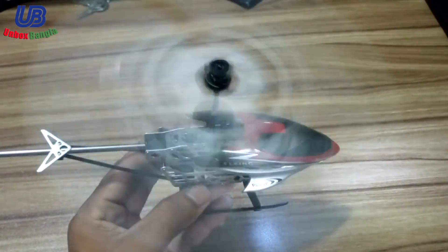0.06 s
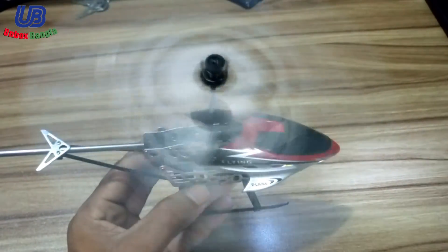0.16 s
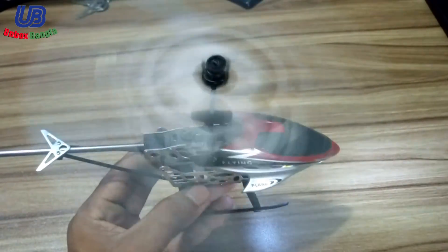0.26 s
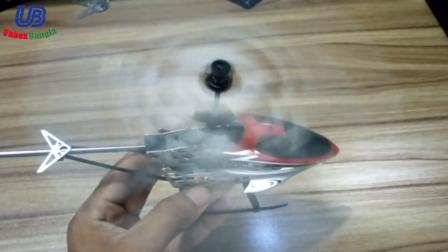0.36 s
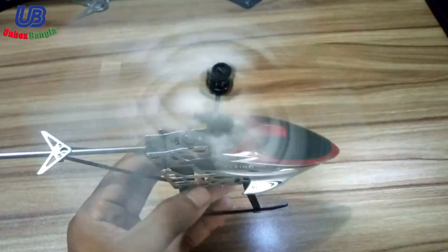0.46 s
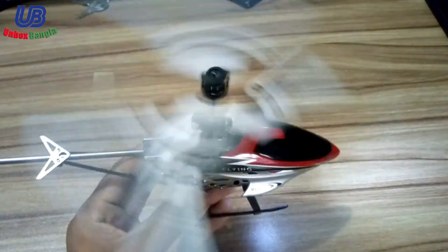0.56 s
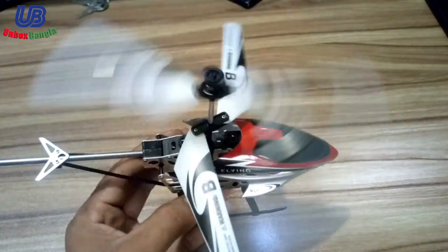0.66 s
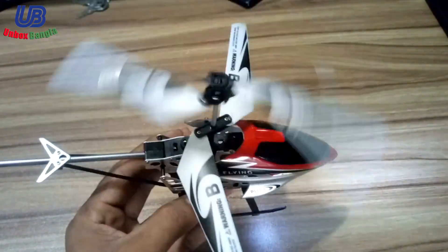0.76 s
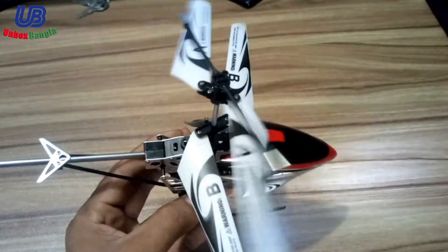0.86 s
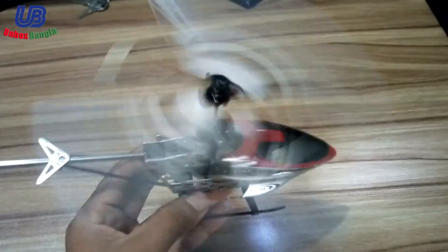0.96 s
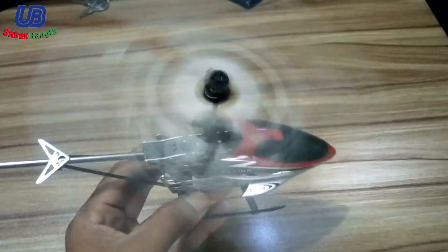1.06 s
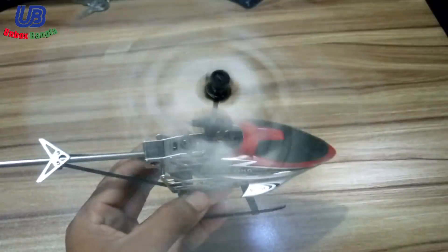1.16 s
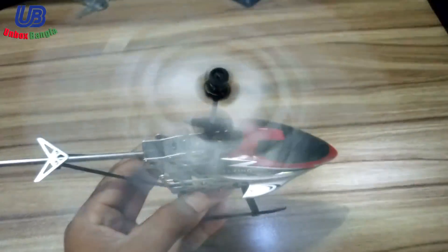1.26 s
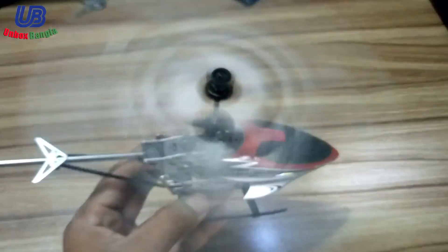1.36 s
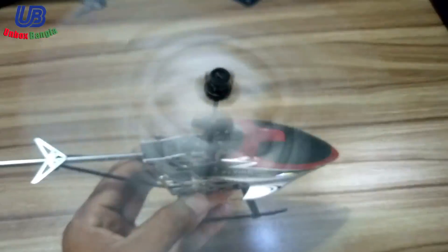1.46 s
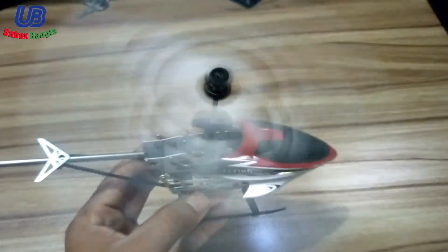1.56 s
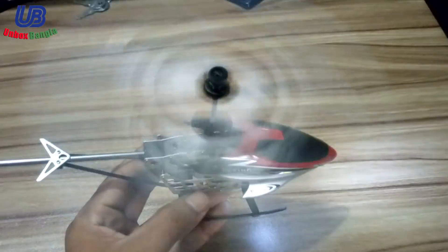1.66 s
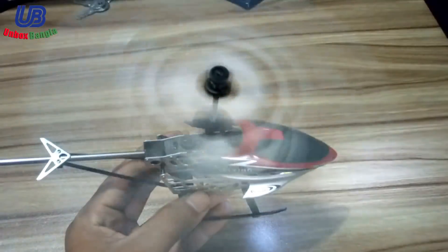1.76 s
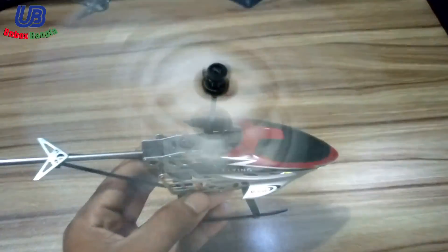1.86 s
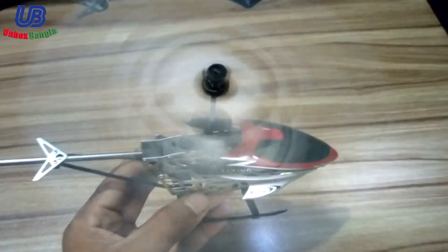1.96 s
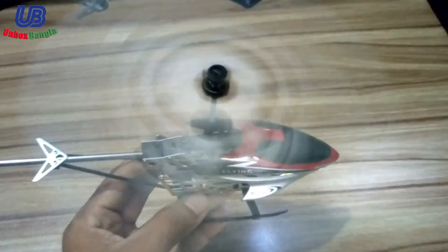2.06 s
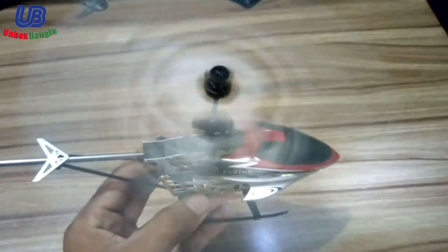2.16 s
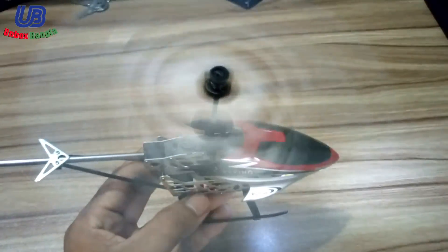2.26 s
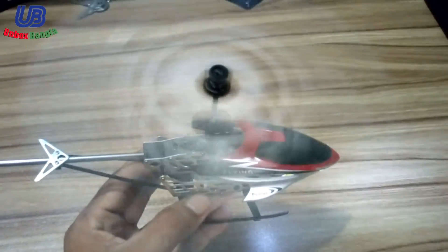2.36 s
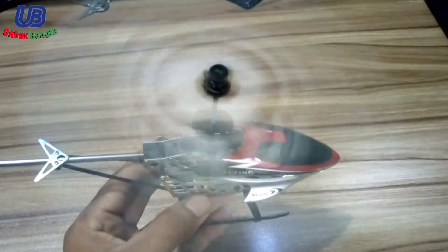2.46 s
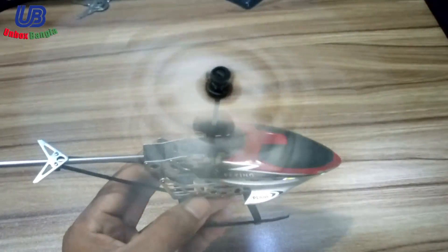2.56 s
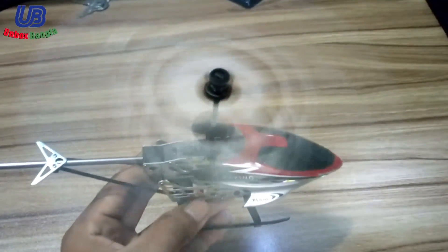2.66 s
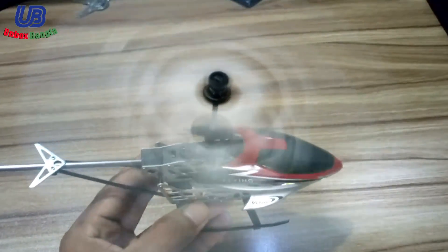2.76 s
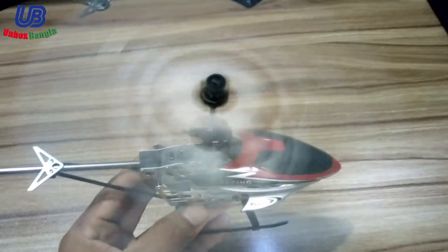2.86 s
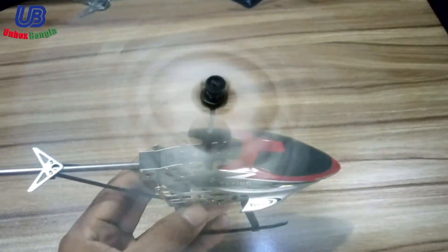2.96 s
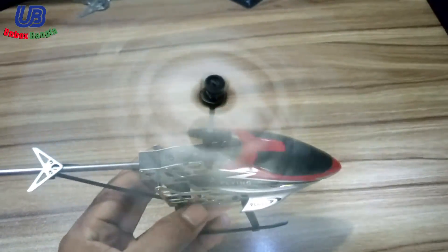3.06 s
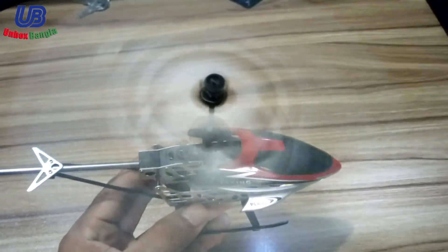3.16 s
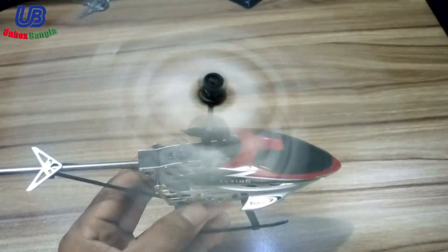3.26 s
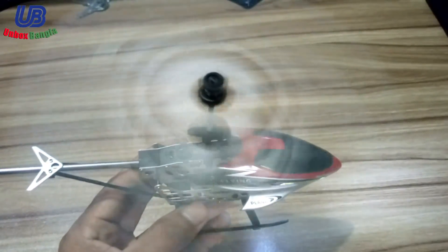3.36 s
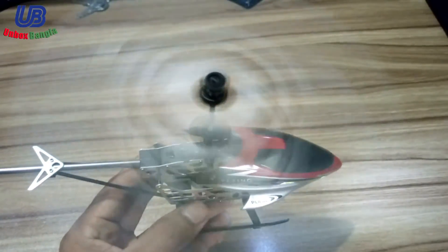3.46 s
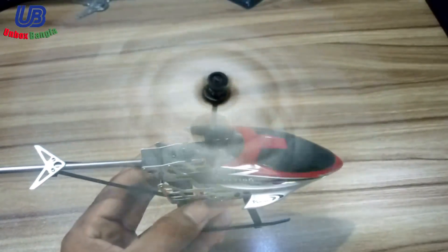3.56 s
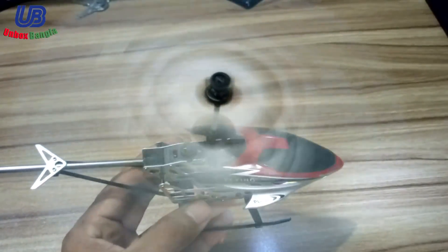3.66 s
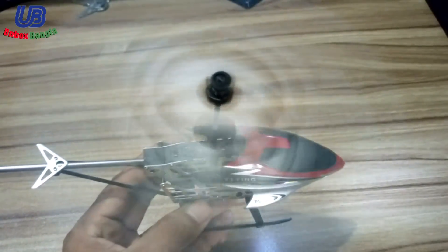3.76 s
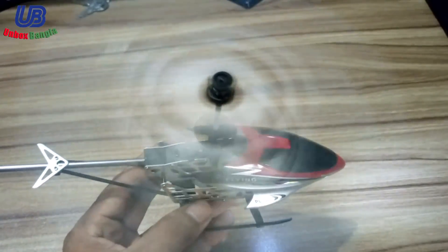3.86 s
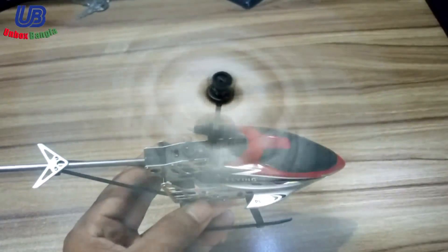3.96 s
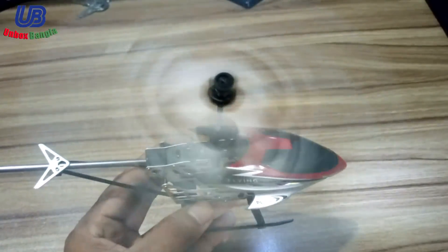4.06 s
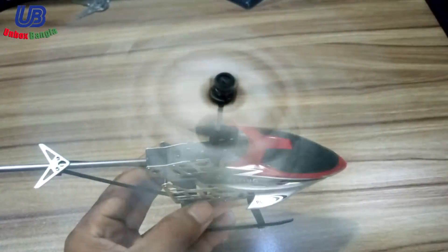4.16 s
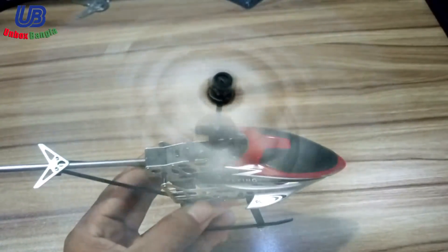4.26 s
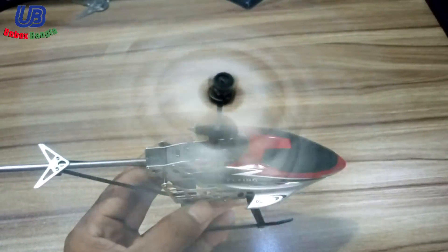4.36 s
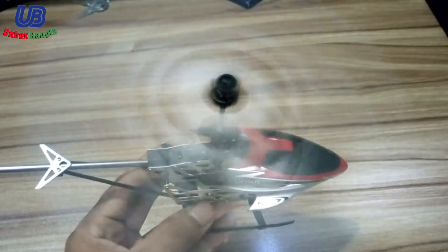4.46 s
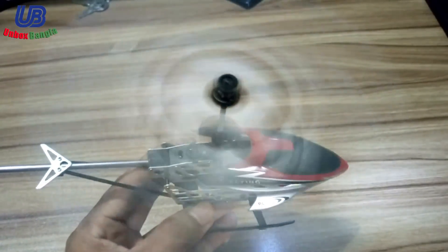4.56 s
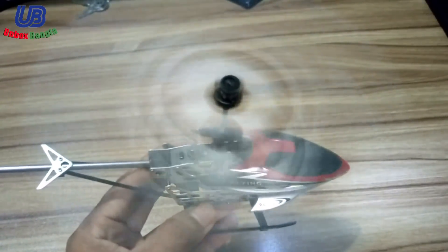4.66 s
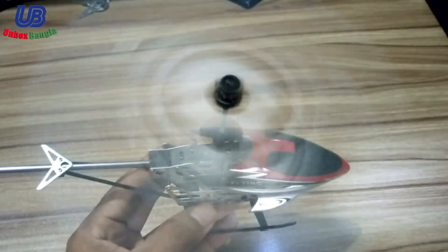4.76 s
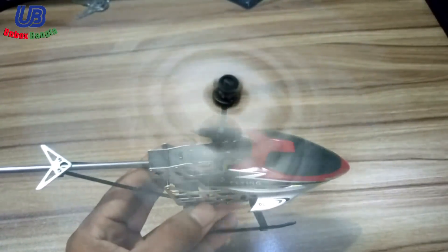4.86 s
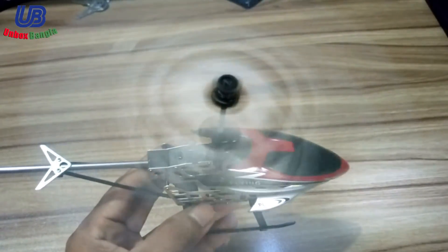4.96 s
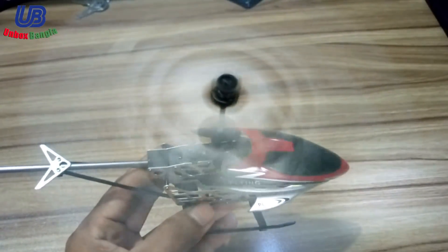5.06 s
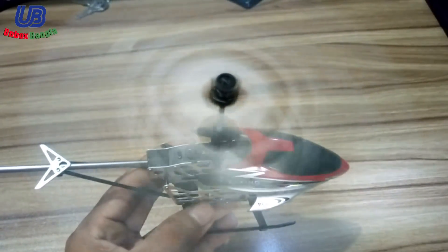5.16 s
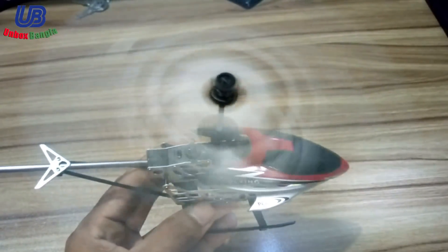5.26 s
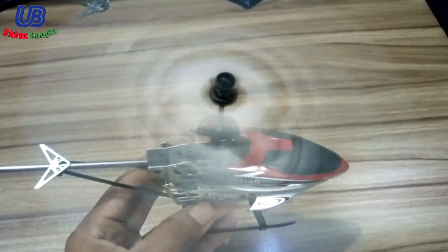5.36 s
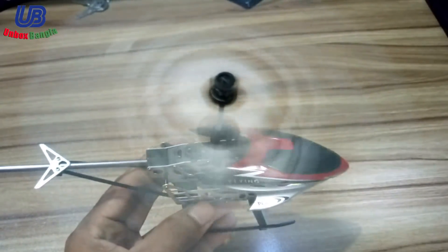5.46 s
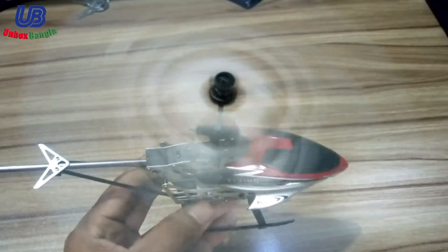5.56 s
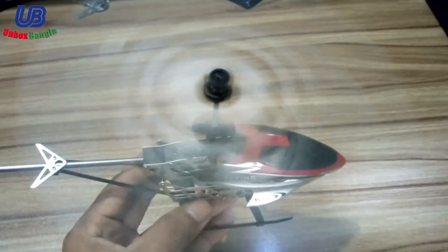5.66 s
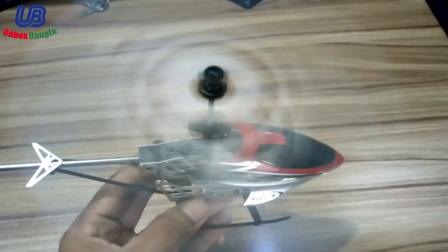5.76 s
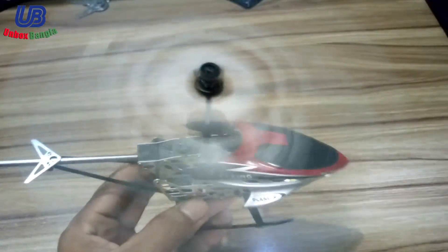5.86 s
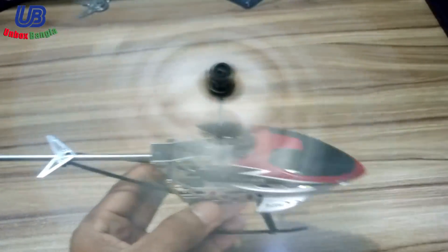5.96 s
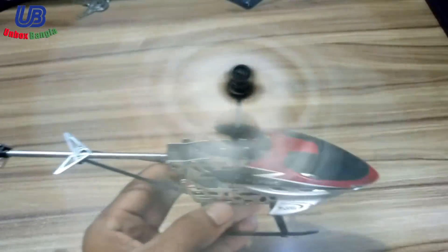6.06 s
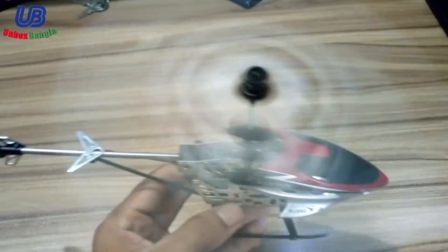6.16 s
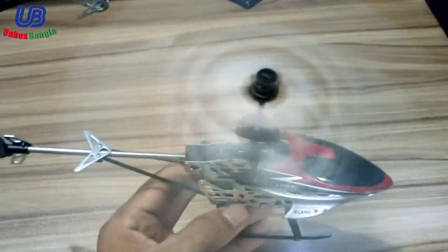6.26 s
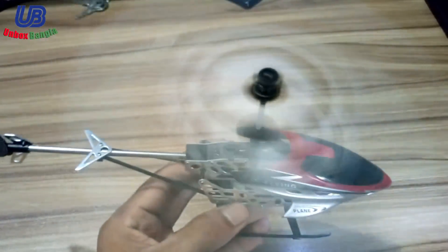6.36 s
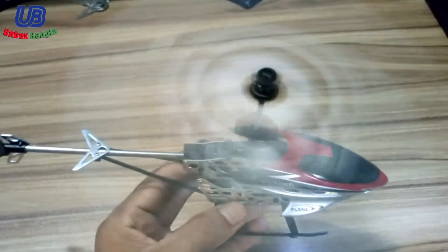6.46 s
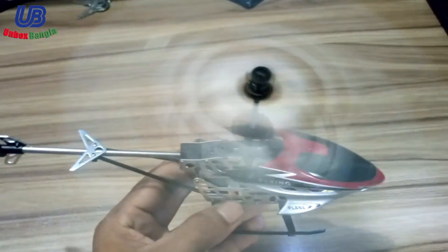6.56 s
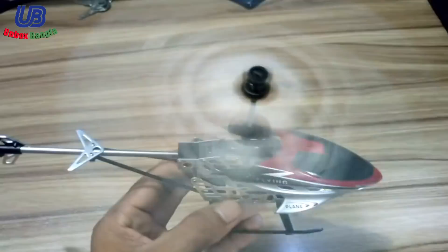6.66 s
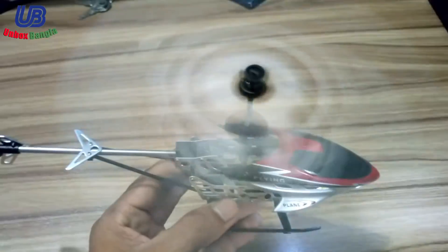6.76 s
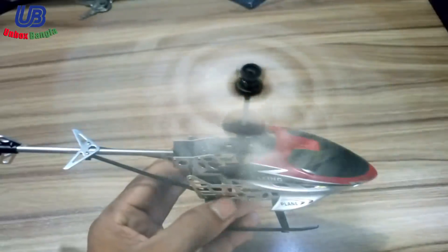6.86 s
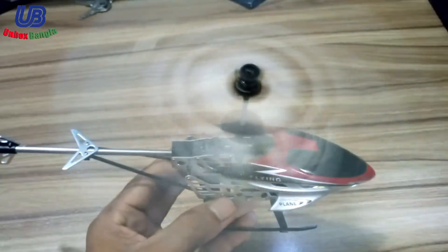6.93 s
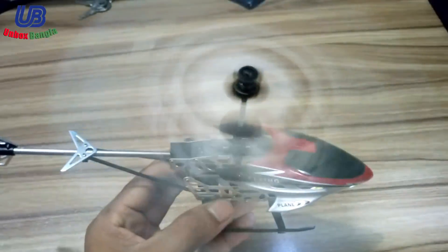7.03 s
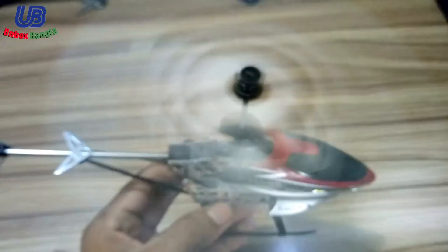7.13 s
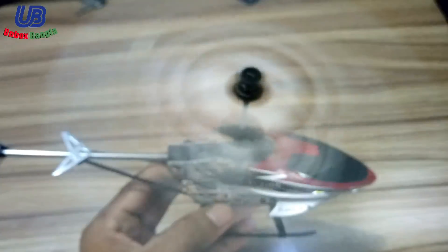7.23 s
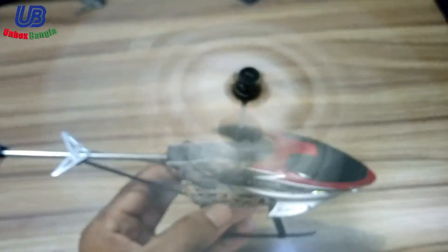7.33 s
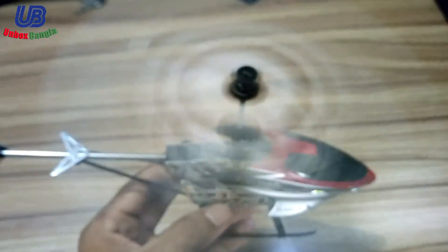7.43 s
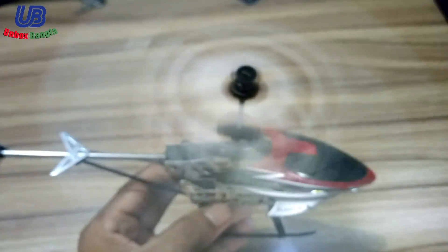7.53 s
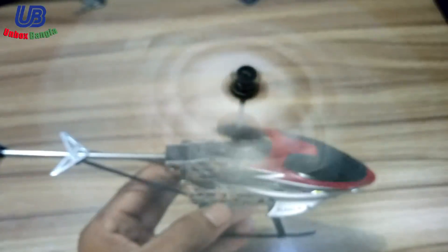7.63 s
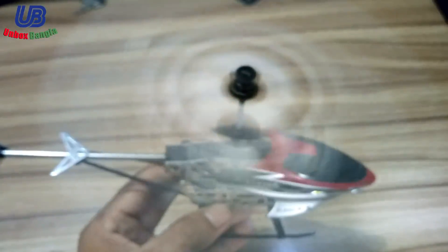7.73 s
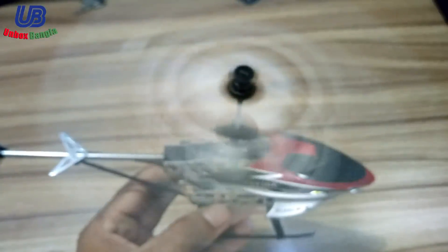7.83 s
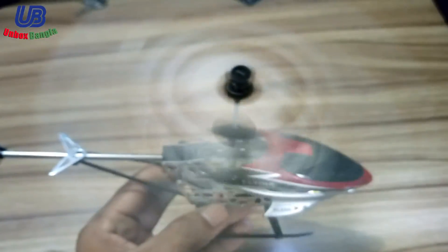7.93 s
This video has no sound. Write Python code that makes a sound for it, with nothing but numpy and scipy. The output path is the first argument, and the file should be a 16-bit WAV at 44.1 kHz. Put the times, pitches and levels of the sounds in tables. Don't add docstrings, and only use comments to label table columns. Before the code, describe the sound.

A toy helicopter's two small motors whine down almost to a stop, tick, then spin up in steps to a steady rattling, buzzing whirr.

```python
import sys
import numpy as np
from scipy import signal
from scipy.fft import rfft, irfft, next_fast_len
from scipy.io import wavfile
from scipy.ndimage import uniform_filter1d, map_coordinates

SR = 44100
rng = np.random.default_rng(int(sys.argv[2]) if len(sys.argv) > 2 else 0)


def nominal_scale(level):
    x = np.asarray(level, float) / 20
    return 10 ** x


def put_to_file(sound):
    columns = np.atleast_2d(sound).T
    safe = np.clip(columns, -1, 1)
    whole_steps = np.round(safe * 32767)
    wavfile.write(sys.argv[1], SR, whole_steps.astype(np.int16))


N = 352471
TIME = np.arange(N) / SR
RIGHT = np.array([[0], [1]])
GEAR_RATIO = 10.48
FULL_TURNS = 507
CUT_S, BITE_S, BITE_LENGTH_S = 0.253, 0.828, 0.018

# centre in Hz, width in Hz, lift in dB.
FRAME = [(363, 270, 10), (826, 510, 5.5), (1060, 330, 9.5), (1854, 134, 16), (3330, 470, -3),
         (4050, 940, 1), (4340, 950, 3.5), (5630, 550, 1), (7650, 280, 8.5)]


def in_time(rows):
    s, *columns = np.transpose(rows)
    return [np.interp(TIME, s, column) for column in columns]


def at_hz(points, hz):
    point_hz, value = np.transpose(points)
    return np.interp(np.log(hz + 1), np.log(point_hz), value)


def rms_one(x):
    return x / np.sqrt(np.mean(x ** 2) + 1e-20)


def drift(rate):
    r = np.exp(-2 * np.pi * rate * 40 / SR)
    noise = rng.standard_normal(N // 40 + 2002)
    slow = signal.lfilter([1], [1, -2 * r, r * r], noise)[2000:]
    return np.interp(np.arange(N) / 40, np.arange(len(slow)), rms_one(slow))


def resonance(hz, centre, width):
    return 1 / (1 + (2 * (hz - centre) / width) ** 2)


def frame_db(hz):
    return sum(db * resonance(hz, centre, width) for centre, width, db in FRAME)


def table_top(hz):
    # left delay in ms, right delay in ms, gain.
    echoes = [(.62, 0.616, 0.093), (1.9, 1.584, 0.056), (4.3, 5.1, 0.043), (9.7, 7.3, 0.085),
              (17.3, 21.1, 0.21)]
    response = 1
    for left_ms, right_ms, gain in echoes:
        delay_s = np.array([[left_ms], [right_ms]]) / 1000
        response = response + gain * np.exp(-2j * np.pi * hz * delay_s)
    return response


def stereo_noise(spectrum, grain_db=0., framed=0.):
    # Hz, share of power alike at both microphones.
    likeness = [(30, .3), (70, 1), (150, 0.79), (700, 0.95), (1200, 0.36), (2200, 0.32), (2700, 0.67),
                (3300, 0.36), (5000, 0.54), (8000, 0.07), (15000, .08)]
    # Hz, left over right in dB.
    lean = [(60, -5), (150, -3), (400, 2.5), (800, 1), (1300, 0), (2400, 2.6), (2900, 0), (4400, 7),
            (7000, 8.5), (8700, 18.5), (11700, 6.5), (13800, 10), (15000, 17)]
    # Hz, left lead in rad.
    port_lead = [(1900, .01), (2650, 0.82), (3300, .01)]
    size = next_fast_len(N)
    hz = np.fft.rfftfreq(size, 1 / SR)
    grains = nominal_scale(grain_db * rng.standard_normal(size))
    shared, left, right = rfft(rng.standard_normal((3, size)) * grains)
    alike = np.clip(at_hz(likeness, hz), 0, 1)
    pair = np.sqrt(alike) * shared * np.exp(-1j * at_hz(port_lead, hz) * RIGHT)
    pair = pair + np.sqrt(1 - alike) * np.array([left, right])
    colour_db = at_hz(spectrum, hz) + framed * frame_db(hz) + at_hz(lean, hz) * (0.5 - RIGHT)
    return rms_one(irfft(nominal_scale(colour_db) * table_top(hz) * pair, size)[:, :N])


def room():
    # Hz, dB per Hz.
    room_tone = [(20, -29), (45, -18), (70, 1.5), (150, -3), (270, -1), (400, -7.5), (600, -15),
                 (1200, -25), (2200, -52), (5000, -45.5), (9000, -66), (15000, -85)]
    return nominal_scale(-49) * stereo_noise(room_tone)


def shafts():
    # start in seconds, upper-rotor motor in turns per s, lower-rotor motor
    # in turns per s (0 = power cut), settling time in seconds.
    throttle = [(0, 331.4, 253.8, .103), (.288, 0, 0, 0), (.812, 461.6, 342.1, .35),
                (1.053, 320, 257.4, .062), (1.273, 272, 249.9, .092), (1.684, 405.7, 363, .136),
                (1.983, 465.8, 448.5, .142), (2.312, 473.9, 434.9, .089), (2.896, 498.3, 461.7, .271),
                (3.299, 496.9, 458.8, .084), (3.864, 473.8, 437.6, .09), (4.08, 483.8, 448.5, .064),
                (4.42, 486.2, 468, .35), (4.559, 536, 490.5, .089), (5.08, 533.5, 491.6, .35),
                (5.618, 533.9, 489.9, .05), (6.33, 533.8, 488.9, .05), (6.712, 479.1, 442.4, .149),
                (6.954, 482.8, 445.8, .05), (7.06, 548.3, 502.3, .35), (7.247, 531.7, 488.8, .062),
                (7.681, 530.6, 485.8, .35)]
    coast_loss = np.array([[504], [374]])
    lower_slower = 1.45
    now = np.array([[300], [223.6]])
    out = np.zeros((2, N))
    ends = [row[0] for row in throttle[1:]] + [TIME[-1] + 1]
    for (s, upper, lower, settle), end in zip(throttle, ends):
        inside = (TIME >= s) & (TIME < end)
        since = np.append(TIME[inside], end) - s
        if upper:
            aim = np.array([[upper], [lower]])
            settle_s = settle * np.array([[1], [lower_slower]])
            speed = aim + (now - aim) * np.exp(-since / settle_s)
        else:
            speed = now - coast_loss * since
        out[:, inside], now = speed[:, :-1], speed[:, -1:]
    return uniform_filter1d(out, size=SR // 30, mode="nearest")


def turns(per_s, wobble):
    return 2 * np.pi * np.cumsum(per_s * (1 + wobble * drift(11.94))) / SR


def coasting_db(speed):
    let_go = np.clip((TIME - CUT_S) / 0.053, 0, 1)
    not_bitten = np.clip((BITE_S - TIME) / BITE_LENGTH_S + .5, 0, 1)
    free = let_go * not_bitten
    return free, free * 20 * np.log10(speed / speed[round(CUT_S * SR)])


def surge_db(speed):
    gaining = np.maximum(np.gradient(speed) * SR, 0)
    return 3 * np.tanh(gaining / 240)


def downwash(speed_b, effort_db):
    # Hz, dB per Hz.
    wash = [(30, -6), (60, -6.5), (120, -4), (300, -7.5), (500, 1), (850, 7), (1300, -12.5), (2000, -32)]
    flow = nominal_scale(-38.5) * (speed_b / FULL_TURNS) ** 3 + nominal_scale(-55.5 + effort_db)
    gusts = nominal_scale(0.78 * drift(1.6) + 0.78 * drift(12.3))
    return flow * gusts * stereo_noise(wash, framed=0.35)


def blade_hiss(rotor_a, rotor_b, effort_db, coast_db):
    # Hz, dB per Hz.
    hiss = [(6000, -18), (8200, -2.5), (10000, -0.5), (12000, 2), (13900, -1.5), (14400, -1), (14900, 7.5),
            (15500, 2.5), (16000, -6)]
    blade_beat = 1 + 0.046 * np.cos(2 * rotor_a) + 0.049 * np.cos(2 * rotor_b + 1.1)
    hiss_db = -38.5 + 1.42 * effort_db + 2.4 * coast_db + 0.42 * drift(25) + 0.6 * drift(3.1)
    return nominal_scale(hiss_db) * blade_beat * stereo_noise(hiss, grain_db=4.5)


def ticks():
    # time in seconds, peak in dB.
    knocks = [
        (0.6916, -37),
        (0.835, -37),
        (0.853, -31),
    ]
    clicks = np.full(N, 1e-18)
    for s, db in knocks:
        clicks[round(s * SR)] = nominal_scale(db - 8)
    clicks = signal.sosfilt(signal.butter(2, 4500, fs=SR, output="sos"), clicks)
    out = np.zeros(N)
    for hz, width, db in FRAME[2:]:
        r, w = np.exp(-np.pi * width / SR), 2 * np.pi * hz / SR
        out += nominal_scale(db - 12) * signal.lfilter([0, np.sin(w)], [1, -2 * r * np.cos(w), r * r], clicks)
    return out * nominal_scale([[2.5], [-2.5]])


def slack_buzz(effort_db):
    # Hz, dB per Hz.
    slack = [(800, -52), (980, -2), (1150, -1), (1350, -5), (1600, -7), (2300, -1), (3000, -4), (3500, -50)]
    return nominal_scale(-43.5 + 0.41 * effort_db + 3.0 * drift(15.0)) * stereo_noise(slack, grain_db=6.0)


def gear_rattle(rotor_a, rotor_b, effort_db):
    # Hz, dB per Hz.
    rattle = [(700, -68), (1100, -24.5), (1500, -15.5), (2200, -8), (2700, -11.5), (3200, 1.5),
              (4200, -0.5), (5500, 0.5), (7000, -2), (7900, -18), (8500, -18), (11000, -26)]
    gear_beat = 1 + 0.036 * np.cos(rotor_a) + 0.1 * np.cos(rotor_b) + 0.048 * np.cos(2 * rotor_a)
    rattle_gain = nominal_scale(-26.5 + effort_db + 0.74 * drift(12.5))
    return rattle_gain * gear_beat * stereo_noise(rattle, grain_db=-1.5, framed=0.97)


def blades(speed, rotor_a, rotor_b):
    passes = [(2, 0), (0, 2), (2, 2), (4, 0), (0, 4), (4, 4), (6, 6), (8, 8), (1, 2), (3, 0), (1, 0)]
    # left level in dB, left over right in dB, left lead in rad.
    blade_tones = [(-36, 1, 1.2), (-33, 13, 4.3), (-37.5, 3.5, -0.33), (-48.5, 20, 2.5), (-59, -11, 4),
                   (-42.5, 2, -0.18), (-56, -10, .2), (-51, -5, 1.3), (-46.5, 14, 5), (-53.5, 14, 1.1),
                   (-56, 5, 3)]
    out = np.zeros((2, N))
    for (count_a, count_b), (db, lean_db, lead) in zip(passes, blade_tones):
        start = rng.uniform(0, 2 * np.pi)
        tone = np.sin(count_a * rotor_a + count_b * rotor_b + start - lead * RIGHT)
        out += nominal_scale(db + 0.5 - lean_db * RIGHT + 1.23 * drift(2.1)) * tone
    return out * (speed / 534) ** 3.44


def frame_hum(speed, effort_db):
    hum_db = -50 + effort_db - 0.15 * np.maximum(speed - 440, 0) + 2.0 * drift(8)
    return nominal_scale(hum_db) * np.sin(2 * np.pi * 330 * TIME)


def through(path, hz):
    return sum(nominal_scale(db - lean_db * RIGHT) * resonance(hz, centre, width) ** 1.46
               for centre, width, db, lean_db in path)


def whine(speed, angle, level_db, free, orders, path, eccentric, swing, waver_db):
    out, rotor = np.zeros((2, N)), angle / GEAR_RATIO
    slow_db = np.minimum(20 * np.log10(speed / FULL_TURNS), 0)
    rough = 1 - 0.31 * np.maximum(slow_db, -6)
    for multiple, db in enumerate(orders, 1):
        start, beat = rng.uniform(0, 2 * np.pi, 2)
        lead = .2 * (multiple - 8) * RIGHT
        wheel = np.cos(rotor + beat) + 0.33 * np.cos(2 * (rotor + beat))
        throb = 1 + eccentric * nominal_scale(1.6 * drift(15.0)) * wheel
        line_db = level_db + db + waver_db * rough * drift(17.6)
        if multiple > 5:
            line_db = line_db - 24 * free
        line_db = line_db + .45 * max(multiple - 8, 0) * slow_db
        coarse = through(path, multiple * speed[::64])
        heard = [np.interp(np.arange(N) / 64, np.arange(len(side)), side) for side in coarse]
        sway = swing * np.sin(rotor + beat)
        out += nominal_scale(line_db) * throb * heard * np.sin(multiple * angle + start - lead + sway)
    return out


def upper_motor(speed, angle, level_db, free):
    orders_a = [-7, -4, -4.5, 0, -6, -9.5, -7, 1.5, -11, -3, 0, -5.5, -17, -18, -5, -1]
    # centre in Hz, width in Hz, level in dB, left over right in dB.
    path_a = [(520, 470, -54.5, 2.5), (1145, 290, -46.5, 25), (1613, 38, -43.5, 15),
              (1874, 230, -26.5, 10.5), (2063, 325, -35.5, -2), (3120, 500, -32.5, 15),
              (3520, 410, -34, 0.5), (4400, 230, -59, 19), (4610, 570, -30, 28), (5690, 360, -38, 20),
              (5890, 150, -27.5, 0), (6610, 400, -23.5, 18), (7560, 900, -47, 20)]
    level_db = level_db + surge_db(speed)
    return whine(speed, angle, level_db, free, orders_a, path_a, eccentric=0.2, swing=0.023, waver_db=2.0)


def lower_motor(speed, angle, level_db, free):
    orders_b = [-3, -12, -3.5, -8.5, -15, -27, -18, 0.2, -16.5, -14, -2.5, 0, -2, -38, -17.5, -12]
    # centre in Hz, width in Hz, level in dB, left over right in dB.
    path_b = [(443, 104, -52, 2.5), (1111, 170, -33, 10), (1866, 240, -34, 37), (2500, 127, -44.5, -10.5),
              (3476, 150, -36, -2.5), (3660, 290, -40, 25), (4000, 330, -29.5, 27), (4550, 370, -27, 31),
              (4940, 240, -37, 9), (5563, 340, -37.5, 34), (6010, 210, -46, 1), (7330, 950, -30.5, 19)]
    level_db = level_db + surge_db(speed)
    return whine(speed, angle, level_db, free, orders_b, path_b, eccentric=0.42, swing=0.68, waver_db=1.3)


def scene():
    # time in seconds, upper whine in dB, lower whine in dB,
    # gear effort in dB re full throttle.
    load = [(0, -32, -32.5, -6), (.2, -34, -27.5, -5.5), (.42, -23, -17.5, -7), (.83, -32, -41, -11),
            (.93, -30.5, -40, -8), (.99, -38.5, -29, -3.5), (1.1, -35, -29, -2.5), (1.24, -28, -29.5, -3),
            (1.35, -34, -27, -4.5), (1.67, -38, -36, -4), (1.74, -27, -35, -0.5), (2.0, -29, -31.5, 1.5),
            (2.3, -26, -20.5, 1), (2.7, -22.5, -20.5, 2), (3.1, -30.5, -19, 1.6), (3.6, -24.5, -19.5, 1.5),
            (4.4, -30, -19.5, 1.25), (4.68, -29.5, -18, 1.94)]
    speed_a, speed_b = shafts()
    whine_a, whine_b, effort_db = in_time(load)
    angle_a, angle_b = turns(speed_a, wobble=0.000955), turns(speed_b, wobble=0.001775)
    rotor_a, rotor_b = angle_a / GEAR_RATIO, angle_b / GEAR_RATIO
    free, coast_db = coasting_db(speed_a)
    effort_db = effort_db + 2.56 * coast_db + 0.38 * drift(5.0)
    whine_db = 28.5 + 1.5 * coast_db

    mix = room() + downwash(speed_b, effort_db)
    mix += blade_hiss(rotor_a, rotor_b, effort_db, coast_db)
    mix += ticks() + slack_buzz(effort_db)
    mix += gear_rattle(rotor_a, rotor_b, effort_db)
    mix += blades(speed_a, rotor_a, rotor_b)
    mix += frame_hum(speed_a, effort_db)
    mix += upper_motor(speed_a, angle_a, whine_a + whine_db, free)
    mix += lower_motor(speed_b, angle_b, whine_b + whine_db, free)
    return mix


def roll_off(x):
    return signal.sosfilt(signal.butter(12, 15560, fs=SR, output="sos"), x)


def record(dry):
    # time in seconds, samples by which left lags.
    lag_rows = [(0, -5), (3, -5.5), (6, -4.5), (8, -3.5)]
    reading = np.arange(N) + in_time(lag_rows)[0]
    right = map_coordinates(dry[1], [reading], order=3, mode="nearest")
    return roll_off(np.array([dry[0], right]))


dry = scene()
out = record(dry)
put_to_file(out)
```